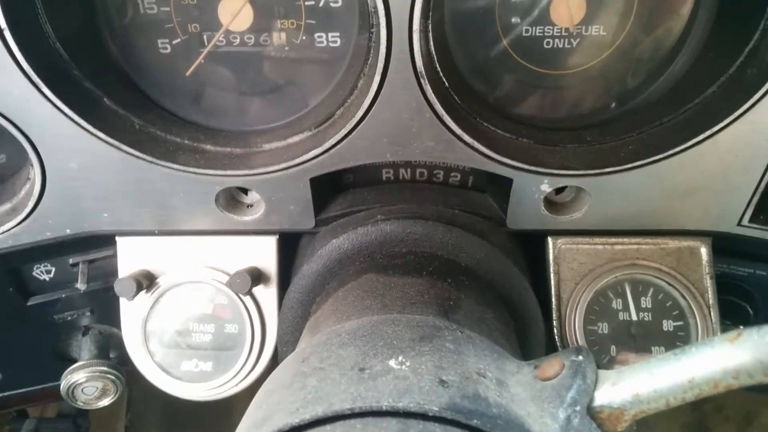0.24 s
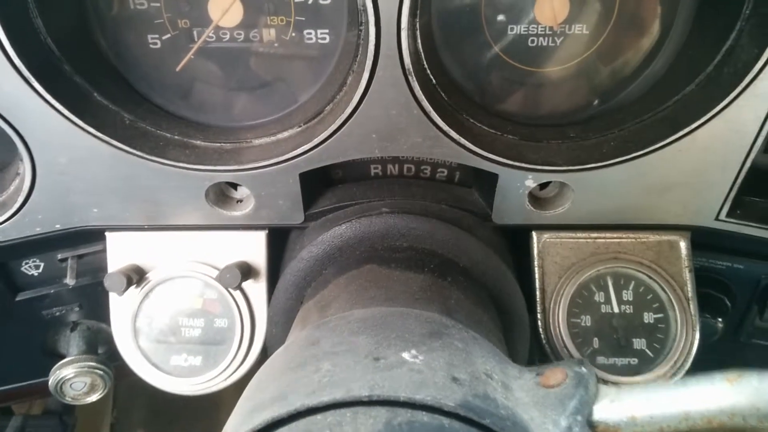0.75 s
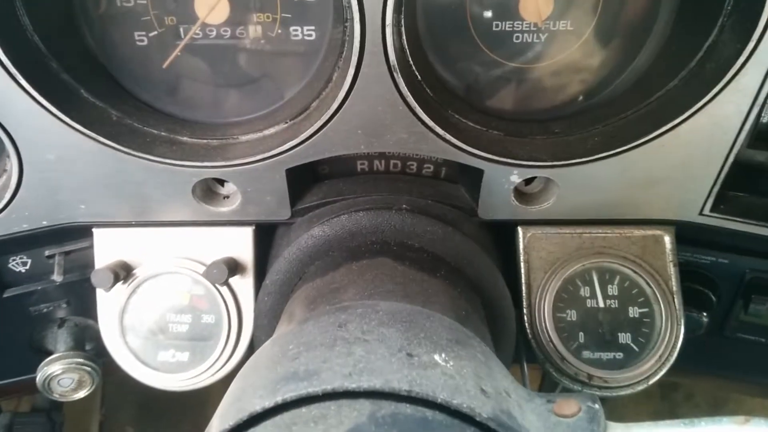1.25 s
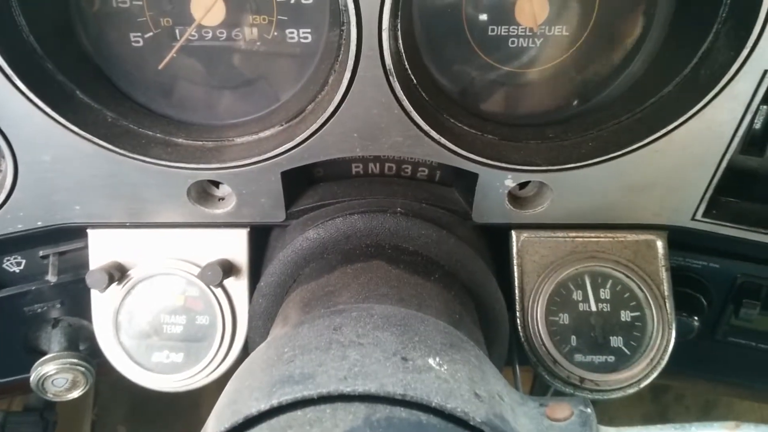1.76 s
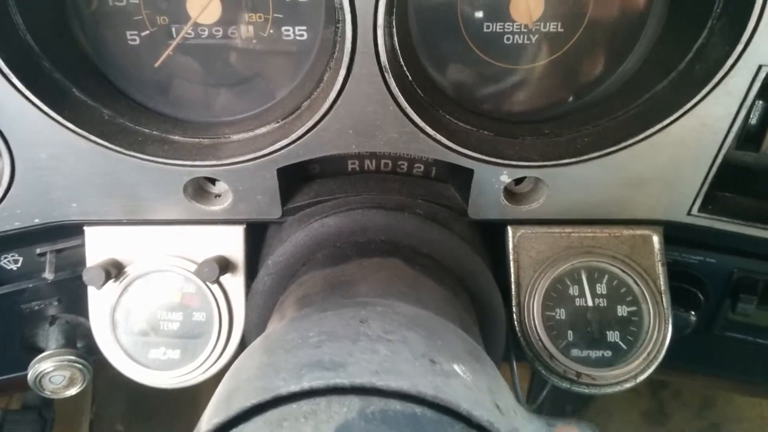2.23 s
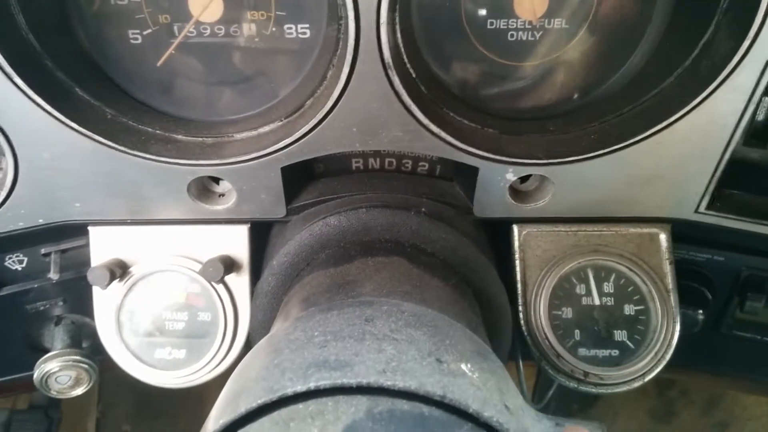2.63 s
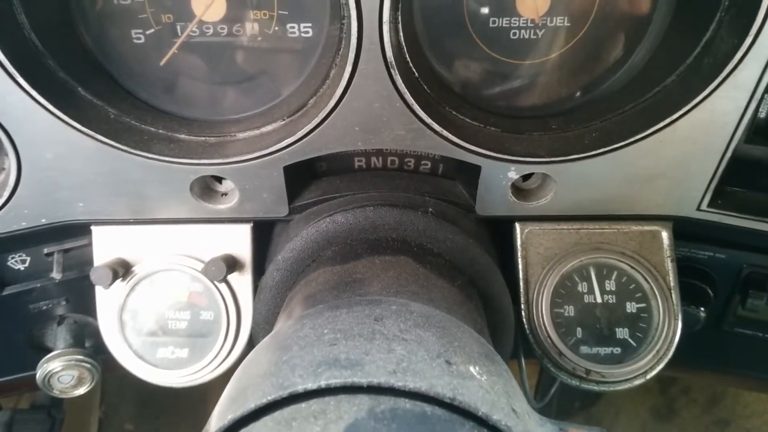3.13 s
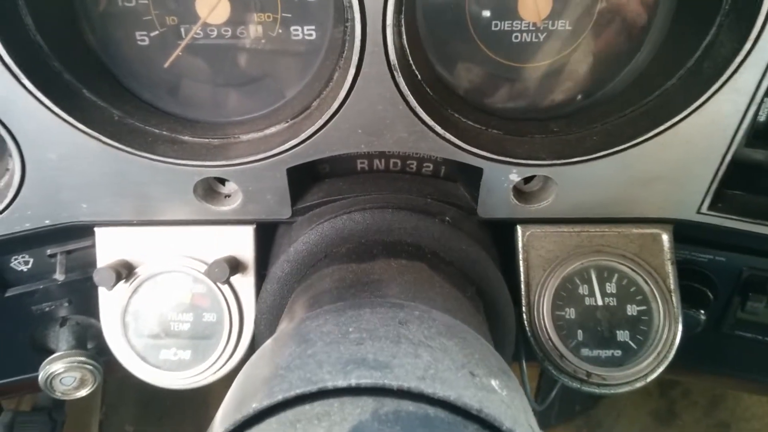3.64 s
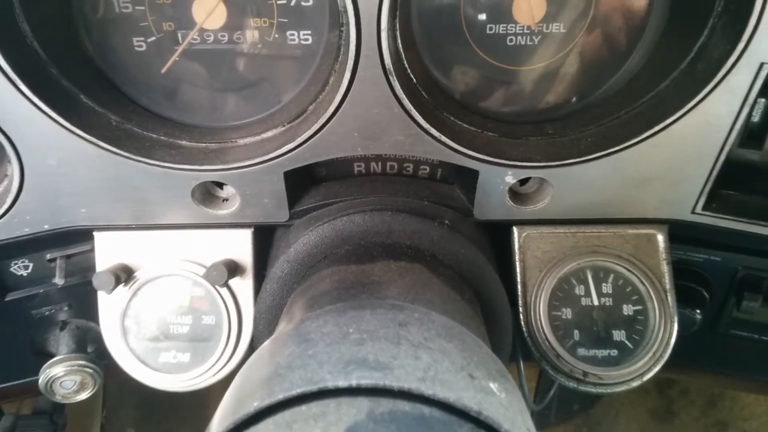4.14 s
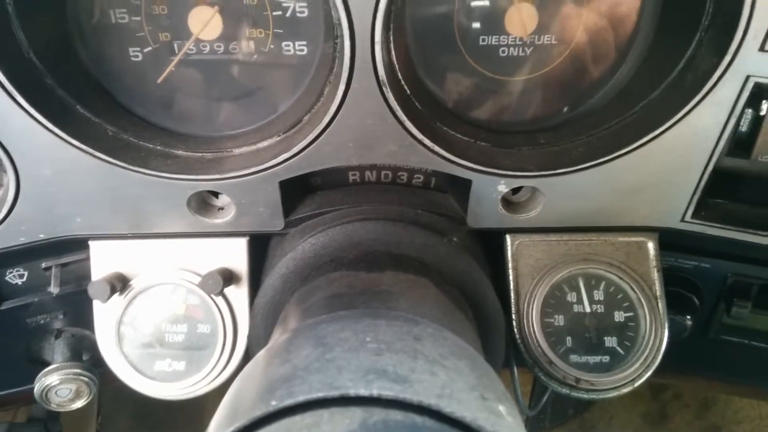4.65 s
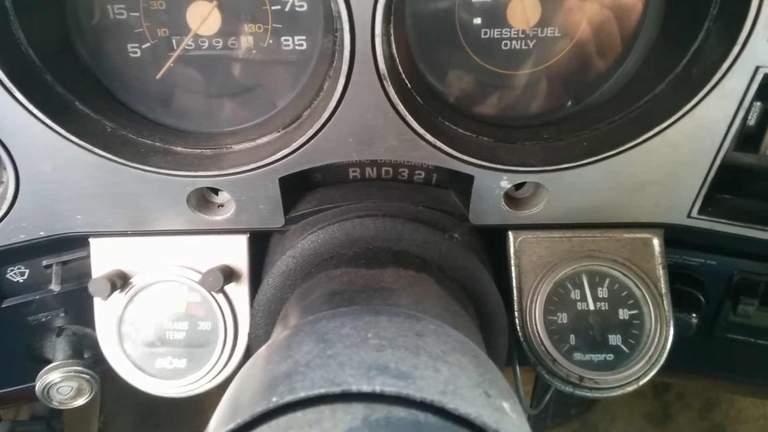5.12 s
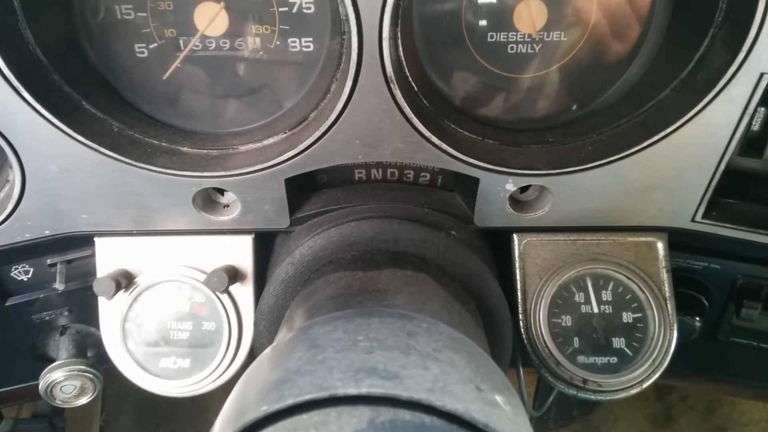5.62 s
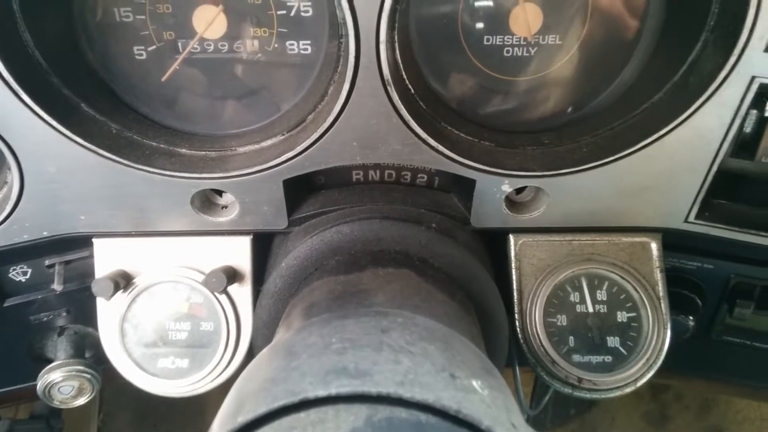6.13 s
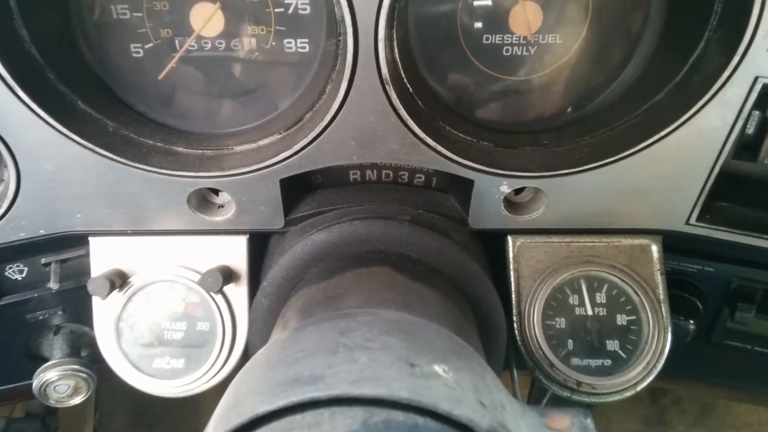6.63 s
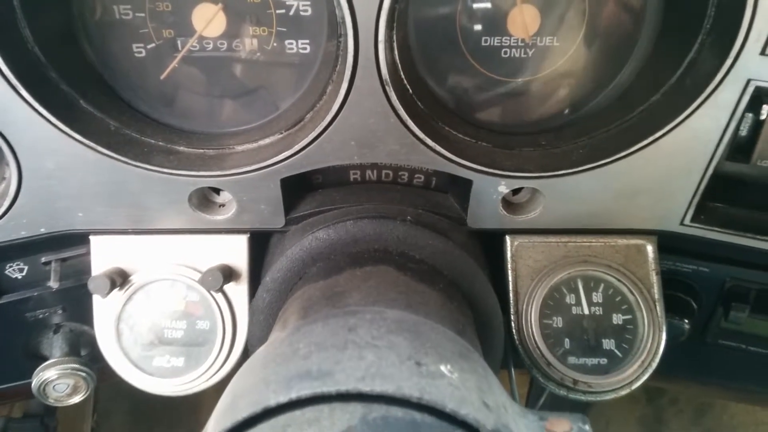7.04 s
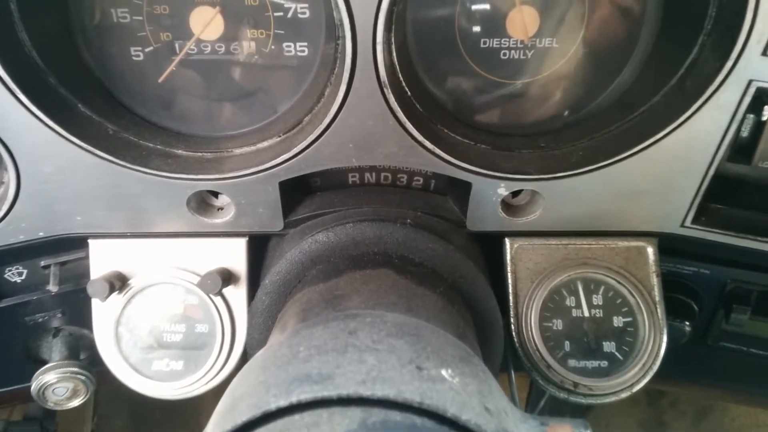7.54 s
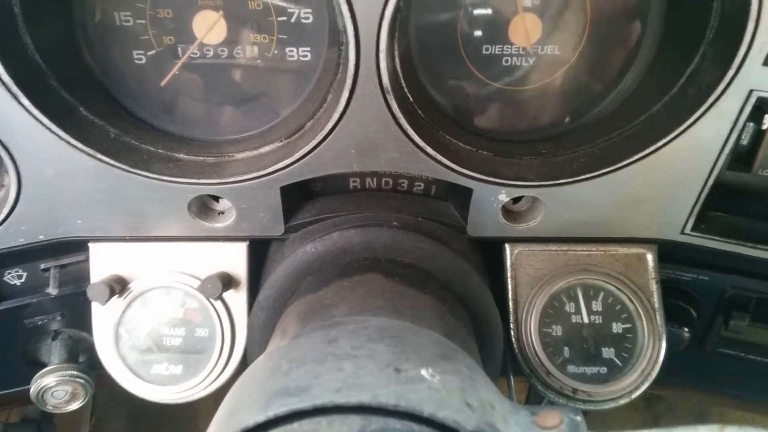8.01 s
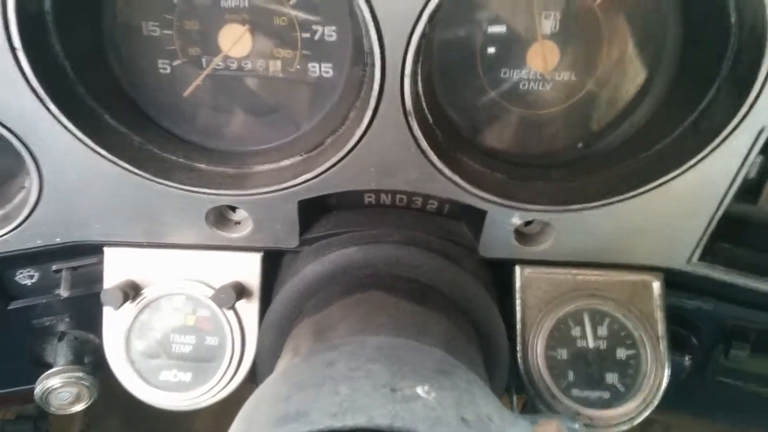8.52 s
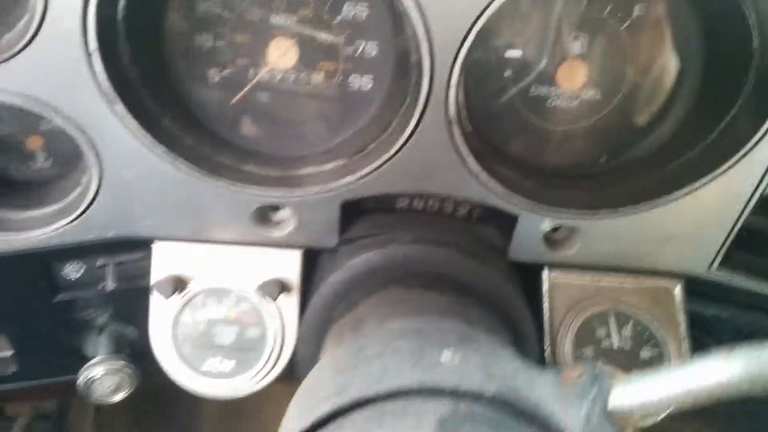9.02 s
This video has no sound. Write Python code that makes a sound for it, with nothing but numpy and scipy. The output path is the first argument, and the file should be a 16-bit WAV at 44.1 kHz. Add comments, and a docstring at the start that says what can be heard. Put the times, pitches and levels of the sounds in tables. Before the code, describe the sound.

A large eight-cylinder diesel idles continuously for about 9.3 seconds, heard inside the cab from the driver's seat with a handheld mono microphone. About forty firings a second make a fast, uneven clatter with hollow midrange ringing, faint valve hiss, low boom and lumpy exhaust thumps. A faint click opens; at 0.95-1.2 a hard shift-lever clunk cracks, with metallic ringing, panel thuds and a low jolt, and the engine level ducks afterwards. Around 2.25-2.5 come a rattle and smaller knocks as the idle sags slightly, then recovers. Softer clicks and rattles occur near 3.5-3.7. At 4.6 a jolt and trim rattle accompany a second, longer sag. From 5 to 8 it is mostly steady, with short rattles near 5.95, 6.75 and 8.25, and speed restored by 8. Ringing clunks cluster at 8.6-8.75; a final sharp knock lands at 9.25.

```python
"""A large eight-cylinder diesel idles, heard from the driver's seat through a hand-held microphone.
Each cylinder's combustion knock excites the block resonances in its own way, as gated noise; crank orders,
exhaust thumps, the strongest as rounded low cycles, and lumpy cab boom that jolts swell lie below it.
The column shift lever clunks through its detents: noise cracks with ringing modes and panel thuds.
The lever linkage ticks and loose trim knocks now and then."""
import sys
import numpy as np
from scipy import signal
from scipy.fft import rfft, irfft
from scipy.io import wavfile
from scipy.ndimage import uniform_filter1d

SR = 44100
rng = np.random.default_rng(int(sys.argv[2]) if len(sys.argv) > 2 else 0)


def waveform_to_disk(signal):
    """Save audio, clipped to [-1, 1], as 16-bit WAV at the path in sys.argv[1]."""
    frames = np.transpose(np.atleast_2d(signal))
    scaled = np.clip(frames, -1, 1) * 32767
    samples = np.round(scaled).astype(np.int16)
    wavfile.write(sys.argv[1], SR, samples)


def level_to_linear(level):
    """Convert decibel levels to linear amplitude factors, elementwise."""
    exponent = np.asarray(level, float) / 20
    return 10 ** exponent


N = 408807
T = np.arange(N) / SR

# idle speed, sagging twice under load: (time [s], firing rate [firings per s])
IDLE_SPEED = [(0.0, 40.26), (2.01, 39.79), (2.37, 38.08), (3.27, 40.3), (4.6, 39.61), (4.75, 38.2),
              (5.0, 38.75), (6.66, 38.8), (8.05, 40.19), (9.27, 40.29)]
FIRST_FIRING, CYLINDERS = -0.36, 8  # starting phase [firings], number of cylinders
# recorded level, which the recorder's automatic gain turns down after loud knocks: (time [s], level [dB])
RECORDED_LEVEL = [(0.0, -36.5), (0.7, -34.5), (1.03, -35), (1.26, -40), (1.57, -43), (2.43, -37),
                  (2.75, -46.5), (3.17, -40), (3.72, -42), (4.1, -37.5), (4.93, -39), (6.71, -36),
                  (7.0, -37.5), (8.52, -36), (8.85, -43), (9.27, -37.5)]
USUAL_LEVEL_DB = -38  # reference for the levels that move with the recorded level
HISS_DB, HISS_FOLLOWS = -75, 0.53  # valve hiss at the usual level [dB]; dB per dB of recorded level
BOOM_DB, BOOM_FOLLOWS = -37, 1  # cab boom likewise
# spectrum of the cab boom: (frequency [Hz], gain [dB])
BOOM_SPECTRUM = [(30, -31), (55, 4), (100, 4), (200, 3), (300, -3.5), (500, -11), (1000, -110)]
# jolts that swell the cab boom: (time of peak [s], peak level [dB], fall [dB per s])
JOLTS = [(1.02, -16, 95.5), (1.48, -31.5, 82), (2.371, -32, 54), (4.599, -27.5, 37.5), (5.849, -35.5, 47),
         (8.601, -28.5, 107.5)]
JOLT_RISE_DB_PER_S = 295
# the strongest of the uneven low thumps: (time of peak [s], peak level [dB], frequency [Hz])
STRONG_THUMPS = [(1.459, -20, 141), (1.762, -24.5, 98), (2.092, -19.5, 90), (2.163, -25, 103),
                 (2.383, -28, 72), (2.463, -20, 111), (3.509, -18.5, 188), (4.262, -23, 104.6),
                 (4.678, -21.5, 70), (4.806, -19, 141), (5.769, -24, 152), (9.211, -21.5, 86)]
THUMP_SWELL_CYCLES = 0.67  # from onset to peak
# ticks of the lever linkage: (time [s], rms level before the decay [dB], frequency [Hz])
TICKS = [(0.889, -49.5, 3370), (1.0428, -37, 4040), (1.22, -53.5, 8000), (2.32, -48, 4000),
         (4.779, -62, 3970), (6.826, -48.5, 3300), (8.619, -34.5, 5800)]
TICK_T60_S = 0.075
# trim rattles: (time [s], level of the driving taps [dB], time to fall by 14 dB [s])
RATTLES = [(0.03, -36.5, 0.059), (0.478, -37, 0.055), (2.247, -24, 0.035), (3.4548, -28, 0.059),
           (4.6052, -25.5, 0.048), (5.9507, -28, 0.049), (6.745, -28.5, 0.06), (8.2383, -33, 0.05),
           (8.58, -29, 0.063)]
# trim modes: (frequency [Hz], width [Hz], level [dB])
TRIM_MODES = [(550, 460, -3), (2206, 220, -8.5), (2880, 330, -9.5), (3600, 350, -17.5), (5710, 300, -29)]
# lever knocks: (time [s], crack rms before the decay [dB], frequency that rings most [Hz],
# tilt above it [dB per octave], ring level re the crack [dB])
KNOCKS = [(0.0328, -40.5, 5550, -21, 2.5), (0.9536, -30, 3600, -10, -13), (0.9614, -15, 3680, -5.5, -16),
          (0.9864, -26, 2175, -7, 11), (1.143, -27, 2276, -11, -18), (1.1736, -23.5, 8120, -26, -12.5),
          (2.251, -31.5, 2200, -5.5, -9), (2.4345, -32.5, 2320, -16, 10), (2.449, -33, 4430, -27, -8),
          (2.4728, -38, 3340, -17.5, -1.5), (3.6645, -32, 2400, -15, 7), (8.6039, -29, 4230, -6.5, -7.5),
          (8.6574, -19.5, 4070, -2, 12.5), (8.7333, -25.5, 1970, -3.5, 19), (9.2503, -15.5, 2280, -1, -10)]
CRACK_T60_S = 0.058
# lever modes: (frequency [Hz], level [dB], T60 of the exponential decay [s])
LEVER_MODES = [(1836, -16, 0.04), (3813, -2.5, 0.0082), (6425, -5, 0.018), (8900, -12, 0.013),
               (10800, -21.5, .03)]
# panel thuds under the hardest lever blows: (time [s], level [dB], frequency that rings most [Hz])
THUDS = [(0.958, -6.5, 666), (0.983, -14.5, 724), (0.992, -12.5, 193.7), (9.254, -18, 905)]
# dash panel modes: (frequency [Hz], T60 [s])
PANEL_MODES = [(195, 0.2), (570, 0.032), (728, 0.03), (910, 0.049)]
# relative exhaust thump of cylinders 1-8: level [dB]
THUMP_CYLINDER_DB = [-6.5, -8.5, 2.5, -4.5, 3, -10.5, 2, 5]
THUMP_LAG = 0.9  # behind the firing [firings]
# floor-pan modes: (frequency [Hz], width [Hz], level [dB])
FLOOR_PAN_MODES = [(58.6, 40, -2.5), (94.6, 37, 1.5), (119.8, 26, -5), (140, 128, -8)]
# crank orders: (multiple of the four-stroke cycle rate [1], relative level [dB])
CRANK_ORDERS = [(16, -13.5), (24, -7.5), (32, -1)]
# block resonances: (frequency [Hz], width [Hz], drive by each of cylinders 1-8 [dB])
BLOCK_MODES = [(338.2, 32, -13.5, -11.5, 2.5, 13.5, 20.5, -26.5, 13, 16.5),
               (469, 88, 1, -0.5, -1, -1, -8, 5, -14, 1.5), (677.5, 104, 7, 8.5, 2, -4, -6.5, 8.5, 5, -2.5),
               (905, 112.5, -9, 5, 5, -6.5, 6, 4.5, 1, -18),
               (1044, 140, -2.5, 0, 5, -7, 15.5, 21.5, 15.5, -17),
               (1307, 62.6, 21, 20, 5, 14.5, -32, -11, 17, -3.5),
               (1726, 160, 5, 10, 12, 5.5, 8.5, 11, -4, -15),
               (2117, 216, 13.5, 11.5, 7, -2, 13.5, 20, 12.5, 5.5),
               (2558, 347, 12.5, 13, 11.5, 4, 9.5, 17, 5, -0.5),
               (3852, 244, -8.5, 12, -0.5, 2.5, 7.5, 12, -8.5, 6.5)]
# relative strength of each block resonance: level [dB]
BLOCK_MODE_DB = [-2.5, -2, 0, 0, 0.5, -4.5, -10.5, -2, -12, -26]
BRIGHTER_DB_PER_S = 0.2636  # gain of the block resonances above 1.5 kHz relative to the lower ones
# spectrum of the broad clatter between the resonances: (frequency [Hz], gain [dB])
CLATTER_SPECTRUM = [(200, -15), (330, -4), (1000, 3), (1600, 12.5), (2200, -1), (3500, -7.5), (6000, -63.5)]
# spectrum of the valve hiss: (frequency [Hz], gain [dB])
HISS_SPECTRUM = [(1800, -41), (2900, -14.5), (4400, -5), (8200, -20.5), (14000, -55)]
SELF_NOISE_DB = -81.5  # rms of the microphone's own noise


def evened(x):
    """Normalization: scales to rms 1."""
    return x / np.sqrt(np.mean(x ** 2) + 1e-20)


def curve(rows):
    """Linear interpolation: joins the second column of a table over time."""
    rows = np.array(rows)
    return np.interp(T, rows[:, 0], rows[:, 1])


def colour(x, points):
    """Spectral shaping: multiplies the Fourier spectrum by a gain joined over log frequency."""
    f, db = np.transpose(points)
    hz = np.fft.rfftfreq(len(x), 1 / SR)
    gain = level_to_linear(np.interp(np.log(hz + 1), np.log(f + 1), db))
    return irfft(rfft(x) * gain, len(x))


def resonate(x, hz, width):
    """Resonance by heterodyning: shifts hz to zero, smooths there and shifts back, with gain 1 at hz."""
    carrier = np.exp(2j * np.pi * np.cumsum(hz * np.ones(N)) / SR)
    r = np.exp(-np.pi * width / SR)
    smooth = x * carrier.conj()
    for _ in range(2):  # twice: steep skirts
        smooth = signal.lfilter([1 - r], [1, -r], smooth)
    return 2 * (carrier * smooth).real


def wander(per_s):
    """Slow random modulation of rms 1: straight lines between random knots, per_s knots a second."""
    knots = np.arange(0, T[-1] + 1, 1 / per_s)
    return evened(np.interp(T, knots, rng.standard_normal(1000)[:len(knots)]))


def add(mix, s, sound):
    """Superposition: adds a sound to the mix from time s [s]."""
    part = mix[round(s * SR):][:len(sound)]
    part += sound[:len(part)]


def follow(usual_db, share):
    """Proportional level: departs from usual_db by a share of the recorded level's departure [dB]."""
    return usual_db + share * (curve(RECORDED_LEVEL) - USUAL_LEVEL_DB)


def boom_level():
    """Power summation: boom [dB] rises and falls with the recorded level; jolts add brief power to it."""
    power = level_to_linear(2 * follow(BOOM_DB, BOOM_FOLLOWS))  # under the same automatic gain
    for s, db, fall_db in JOLTS:
        after = T - s
        jolt_db = db + np.minimum(JOLT_RISE_DB_PER_S * after, -fall_db * after)
        power = power + level_to_linear(2 * jolt_db)
    return 10 * np.log10(power)


def boom(boom_db):
    """Random vibration: low noise of uneven strength shakes the cab panels."""
    lumps = level_to_linear(4 * wander(24)) * rng.standard_normal(N)
    return level_to_linear(boom_db - 3.5) * evened(colour(lumps, BOOM_SPECTRUM))


def ticks():
    """Damped impact: short dry contacts of the lever linkage, noise broad around one pitch."""
    out, t = np.zeros(N), T[:SR // 10]
    for s, db, hz in TICKS:
        noise = evened(colour(rng.standard_normal(len(t)), [(hz / 3, -25), (hz, 0), (16000, -40)]))
        add(out, s, level_to_linear(db - 60 * t / TICK_T60_S) * np.minimum(t / 0.0018, 1) * noise)
    return out


def rattles():
    """Forced vibration: uneven taps ring the modes of loose trim, keep up, then stop quickly."""
    drive, t = np.zeros(N), T[:SR // 3]
    for s, db, length in RATTLES:
        unevenness = level_to_linear(2 * evened(uniform_filter1d(rng.standard_normal(len(t)), 90)))
        taps = rng.standard_normal(len(t)) * unevenness
        envelope = level_to_linear(np.maximum(db - 14 * (t / length) ** 2, -120)) * np.minimum(t / 0.0024, 1)
        add(drive, s - 0.003, envelope * taps)
    contact = evened(colour(drive, [(300, 2.5), (3400, -3), (7000, -32), (9500, -73)]))
    out = level_to_linear(-4.5) * contact * np.std(drive)  # dull contact noise
    for hz, width, db in TRIM_MODES:
        level = level_to_linear(db + 2 * wander(3)) * np.sqrt(SR / width / 4)
        mode_hz = hz + 0.25 * width * wander(3)  # the pitch wanders slowly a little
        out = out + level * resonate(drive, mode_hz, width)
    return out


def lever_ring(t, near_hz):
    """Modal excitation: the lever modes near the pitch of the spot struck ring most."""
    ring = 0
    for hz, mode_db, t60 in LEVER_MODES:
        near_db = -12 * abs(np.log2(hz / near_hz))
        # builds while the parts stay in contact
        swell = (t / t60 * 18) * level_to_linear(mode_db + near_db - 60 * t / t60)
        ring += swell * np.sin(2 * np.pi * (hz * t + rng.random()))
    return ring


def lever_knocks():
    """Impact and reverberation: each blow is a noise crack with ringing modes and a short cab tail."""
    out, t = np.zeros(N), T[:SR // 3]
    for s, db, near_hz, tilt_db, ring_db in KNOCKS:
        top_db = tilt_db * np.log2(12000 / near_hz)
        shape = [(400, -35), (near_hz * 0.29, -6), (near_hz, 0), (12000, top_db), (16000, top_db - 13)]
        noise = evened(colour(rng.standard_normal(len(t)), shape))
        # the parts bounce on each other
        chatter = level_to_linear(2 * evened(uniform_filter1d(rng.standard_normal(len(t)), 150)))
        crack = noise * chatter * level_to_linear(-60 * t / CRACK_T60_S) * np.minimum(t / 0.000056, 1)
        duller = evened(colour(noise[::-1], [(5000, 1.5), (15000, -5)]))
        tail = level_to_linear(-19.5 - 60 * t / 0.24) * duller * chatter[::-1] ** 2  # rattling
        add(out, s, level_to_linear(db) * (crack + tail + level_to_linear(ring_db) * lever_ring(t, near_hz)))
    return out


def panel_thuds():
    """Modal decay: the hardest lever blows ring the dash panel, most in modes near one pitch."""
    out, t = np.zeros(N), T[:SR // 3]
    for s, db, near_hz in THUDS:
        for hz, t60 in PANEL_MODES:
            mode_db = db - 10.43 * abs(np.log2(hz / near_hz))
            envelope = level_to_linear(mode_db - 60 * t / t60) * np.minimum(t / 0.0023, 1)
            add(out, s, envelope * np.sin(2 * np.pi * (hz * t + rng.random())))
    return out


def strong_thumps():
    """Transient response: the strongest of the uneven low thumps, each a few rounded cycles."""
    out, t = np.zeros(N), T[:SR // 5]
    for s, db, hz in STRONG_THUMPS:
        swell = t * hz / THUMP_SWELL_CYCLES
        envelope = swell * np.exp(1 - swell)  # peaks at 1
        tone = np.sin(2 * np.pi * (hz * t + rng.random()))
        add(out, s - THUMP_SWELL_CYCLES / hz, level_to_linear(db) * envelope * tone)
    return out


def thumps(firings, boom_db):
    """Impulse response: exhaust pulses knock the floor pan, some cylinders much harder than others."""
    count = np.floor(firings - THUMP_LAG).astype(int)
    chance_db = 4.5 * np.clip(rng.standard_normal(500), -3, 1)[count]
    size = level_to_linear(np.asarray(THUMP_CYLINDER_DB)[count % CYLINDERS] + chance_db)
    pulses = np.diff(count, prepend=count[0]) * size
    ring = sum(level_to_linear(db) * resonate(pulses, hz, width) for hz, width, db in FLOOR_PAN_MODES)
    # the pan is too small to radiate deep bass
    return level_to_linear(boom_db) * evened(colour(ring, [(25, -30), (55, -1)]))


def orders(firings, boom_db):
    """Harmonic series: the steady firing tone and its wavering multiples swell with the cab boom."""
    multiples = np.zeros(N)
    for k, db in CRANK_ORDERS:
        cycles = k * firings / CYLINDERS + 0.07 * wander(6)
        multiples += level_to_linear(db + 6 * wander(12)) * np.cos(2 * np.pi * cycles)
    firing_tone = level_to_linear(0.64 * boom_db - 16) * np.cos(2 * np.pi * firings)
    return firing_tone + level_to_linear(boom_db - 10) * evened(multiples)


def bursts(firings, cylinder_db, spread_db, floor_db):
    """Amplitude modulation: combustion gates noise; each firing swells softly and dies into the next."""
    count = np.floor(firings + 0.2).astype(int)
    size_db = np.asarray(cylinder_db)[count % CYLINDERS] + spread_db * rng.standard_normal(500)[count]
    start = np.diff(count, prepend=count[0]) * level_to_linear(size_db)
    gate = signal.lfilter([1], [1, -np.exp(-1 / (0.015 * SR))], start)
    gate = uniform_filter1d(gate, 640, origin=300)
    angle = (firings / CYLINDERS % 1 * 8900).astype(int)
    habit = rng.standard_normal(8900)[angle]  # the same parts strike at the same crank angle every cycle
    noise = 0.6 * habit + 0.8 * rng.standard_normal(N)
    return (gate + level_to_linear(floor_db)) * noise


def block_rings(firings):
    """Resonance: each cylinder's knock drives every mode of block and firewall by its own amount."""
    rings = 0
    for (hz, width, *cylinder_db), db in zip(BLOCK_MODES, BLOCK_MODE_DB):
        for side in (-1, 1):  # each resonance is a close pair of narrower modes
            drive = bursts(firings, cylinder_db, spread_db=2.5, floor_db=-26)
            # the pitch of each mode wanders slowly a little
            mode_hz = hz + width * (0.43 * side + 0.21 * wander(15))
            level_db = db + BRIGHTER_DB_PER_S * T * (hz > 1500) + 1.5 * wander(7)
            rings = rings + level_to_linear(level_db) * evened(resonate(drive, mode_hz, 0.75 * width))
    return evened(rings)


def clatter(firings):
    """Source and filter: combustion knock rings the block, with broad clatter and valve hiss between."""
    rings = block_rings(firings)
    mean_db = np.mean(np.array(BLOCK_MODES)[:, 2:], axis=0)  # average drive by each cylinder
    broad = evened(colour(bursts(firings, mean_db, spread_db=3, floor_db=-20), CLATTER_SPECTRUM))
    hiss = evened(colour(bursts(firings, mean_db, spread_db=3.5, floor_db=-14), HISS_SPECTRUM))
    body = level_to_linear(curve(RECORDED_LEVEL)) * (rings + level_to_linear(-12) * broad)
    uneven = level_to_linear(1.3 * wander(12))
    return uneven * (body + level_to_linear(follow(HISS_DB, HISS_FOLLOWS)) * hiss)


def scene():
    """Superposition of cab, trim, lever and engine at the seat; one firing count drives the engine."""
    firings = FIRST_FIRING + np.cumsum(curve(IDLE_SPEED)) / SR
    boom_db = boom_level()
    thump_db = boom_db + 1.5 + 2.5 * wander(10)  # the thumps come in lumps
    cab = boom(boom_db) + rattles()
    lever = ticks() + lever_knocks() + panel_thuds()
    exhaust = strong_thumps() + thumps(firings, thump_db)
    engine = orders(firings, boom_db) + clatter(firings)
    return (cab + lever + exhaust + engine)[None]


def top_cut(x):
    """Nothing passes above the cut-off."""
    return signal.sosfilt(signal.butter(12, 16640, fs=SR, output="sos"), x)


def record(dry):
    """Additive noise: the microphone's self-noise is white and independent of the sound."""
    mix = dry + level_to_linear(SELF_NOISE_DB) * rng.standard_normal(dry.shape)
    return top_cut(mix)


dry = scene()
out = record(dry)
waveform_to_disk(out)
```